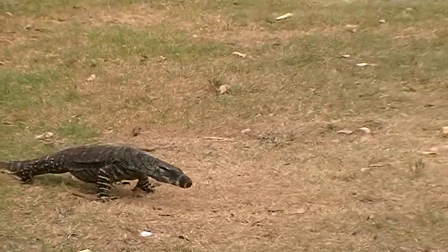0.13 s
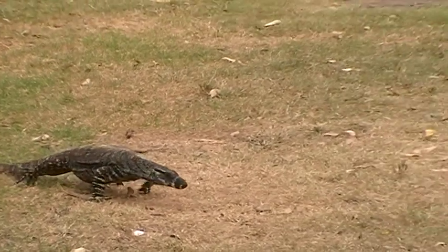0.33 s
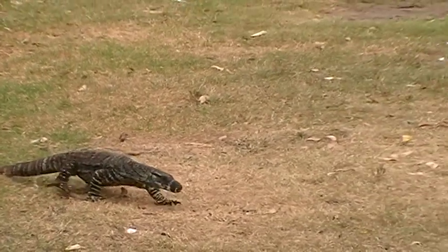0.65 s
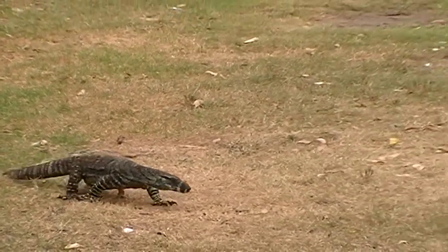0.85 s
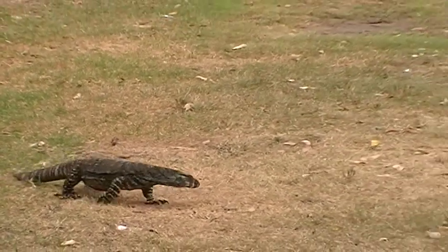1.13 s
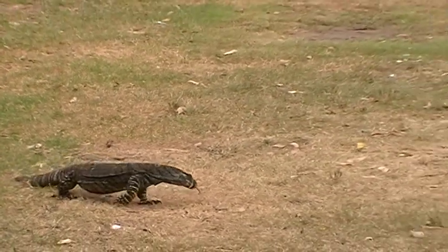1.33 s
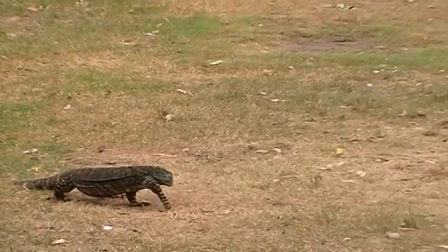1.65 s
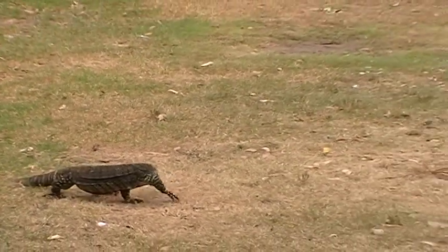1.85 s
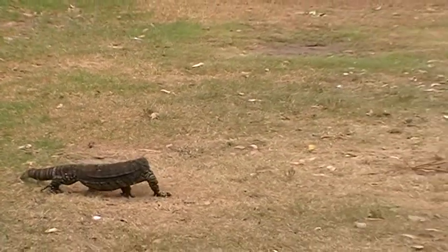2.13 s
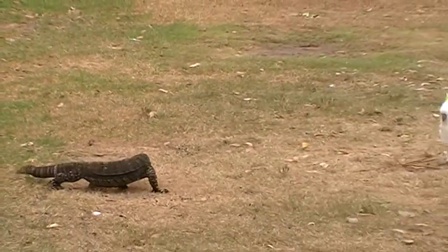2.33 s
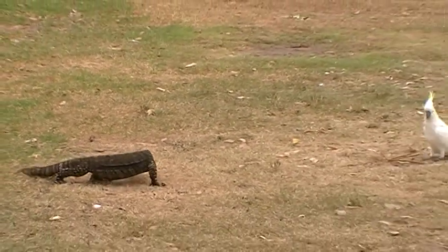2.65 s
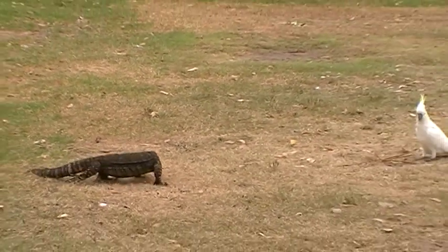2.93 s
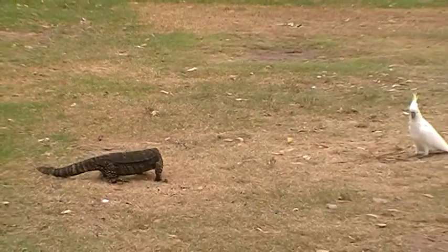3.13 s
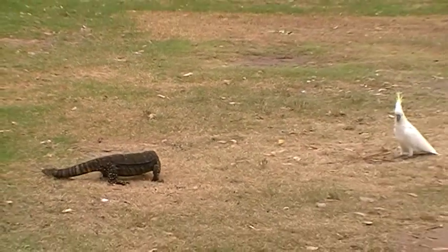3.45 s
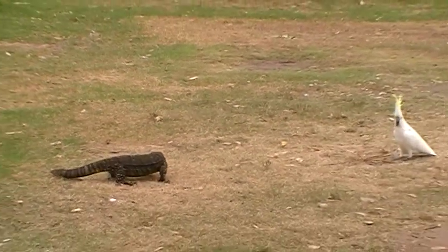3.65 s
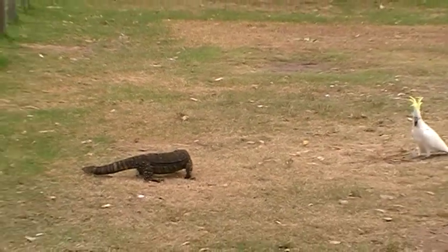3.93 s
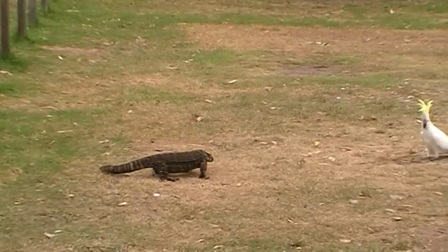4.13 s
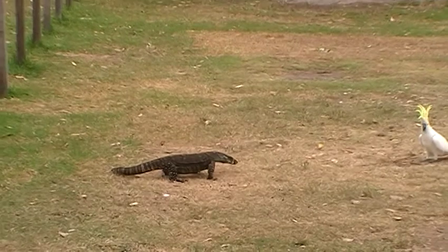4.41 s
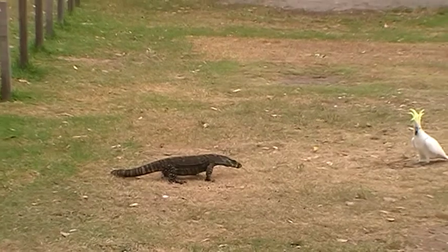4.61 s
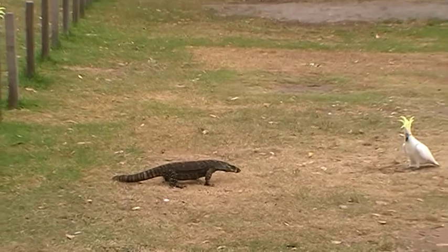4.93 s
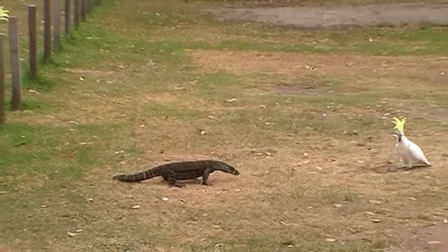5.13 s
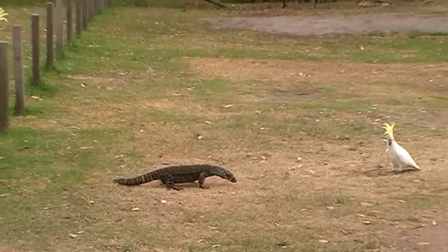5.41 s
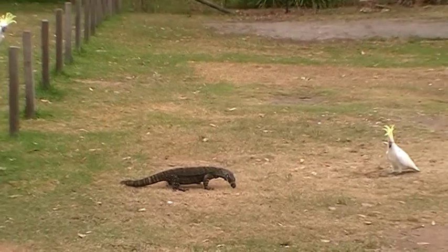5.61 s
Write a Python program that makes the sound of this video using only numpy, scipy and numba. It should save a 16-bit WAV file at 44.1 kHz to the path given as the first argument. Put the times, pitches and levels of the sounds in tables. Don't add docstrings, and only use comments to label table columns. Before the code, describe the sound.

After three seconds of soft leaves, far caws and small chirps, a cockatoo screeches harshly close by, pauses briefly, then shrieks again, cut short.

```python
import sys
import numpy as np
from scipy import signal
from scipy.fft import rfft, irfft
from scipy.io import wavfile
from scipy.ndimage import uniform_filter1d, map_coordinates
from numba import njit

SR = 44100
rng = np.random.default_rng(int(sys.argv[2]) if len(sys.argv) > 2 else 0)


def store_pcm(level_fs):
    pcm = np.round(np.clip(level_fs, -1, 1) * 32767).astype(np.int16)
    wavfile.write(sys.argv[1], SR, np.atleast_2d(pcm).T)


def rack_gain(trim_db):
    fader = np.asarray(trim_db, float)
    return 10 ** (fader / 20)


N = 254456

# (start [s], length [s], level [dB])
SCREECHES = [
    (3.204, 1.975, -19.5),
    (5.666, .3, -19.5),
]
# (time [s], effort [dB], burst rate [Hz], unsteadiness [0-1], beak gape [0-1])
POSTURES = [
    [(3.22, -1, 329.9, 0.34, 0), (3.33, 1, 325, 0.74, 0.44), (3.6, -1.5, 370.9, 0.81, 0.86),
     (3.72, 1.5, 350.7, 0.83, 0.67), (3.96, -0.5, 349.2, 1.09, 0.84), (4.22, 0.5, 324.4, 1.13, 0.52),
     (4.47, -0.5, 305.4, 1.02, 0.22), (4.72, -0.5, 338.5, 1, 0.67), (5.18, -1, 340.1, 0.82, 0.8)],
    [(5.67, 4, 333, 0.68, 0.79), (5.77, -2.5, 323.9, 0.94, 0.87)],
]
# (time [s], level [dB], half width [s])
LEVEL_DIPS = [
    (4.262, -3, 0.047),
    (4.828, -2, 0.034),
]
# (time [s], half width [s], extra strong-weak alternation [dB])
STEADY_LOCKS = [
    (3.385, 0.034, 5),
    (4.88, .03, 1),
    (4.952, 0.027, 3.5),
    (5.09, .025, -5.5),
]
# (time [s], level [dB])
THROAT_FLARES = [
    (3.205, 23),
    (3.302, 17),
    (3.55, 14.5),
    (4.53, 18.5),
    (4.701, 12),
    (5.17, 6.5),
]
# (time [s], turn [0-1])
HEAD_TURN = [(3.22, 0.54), (3.3, 0.23), (3.6, 0.27), (3.93, 0.59), (4.22, 0.49), (4.28, 0.26), (4.47, 0),
             (4.65, 0.42), (4.9, 0.66)]
# (time [s], delay [ms])
HEAD_BOB = [(3.2, .7), (3.6, .85), (3.9, .74), (4.22, .98), (4.3, .885), (4.43, .76), (4.52, .75),
            (4.67, .92)]
# (frequency [Hz], level [dB per Hz])
SLAP_SPECTRUM = [(120, -32), (200, -51), (586, -17), (859, -23.5), (994, -10.5), (1430, -17), (1950, -4.5),
                 (2860, -2.5), (3370, -0.5), (4040, -4.5), (4590, -8), (7930, -15), (9860, -31.5),
                 (12500, -41), (15600, -59.5)]
# (centre [Hz], width [Hz], boost [dB])
WINDPIPE_MODES = [(1939, 68, 7.5), (2139, 118, 4.5), (2240, 70, 3), (2367, 20, 10), (2857, 99, 6),
                  (3336, 86, -12.5), (4019, 195, 7.5), (4730, 670, -0.5), (6970, 300, 1.5),
                  (10370, 190, 6.5)]
# (frequency [Hz], level [dB per Hz])
SCATTER_SPECTRUM = [(590, -61), (1000, -49), (1190, -49), (1490, -48), (1630, -41), (1680, -72),
                    (1930, -10), (2370, 3), (3440, -1.5), (5230, -3), (6410, -6), (7100, -8.5),
                    (8710, -6.5), (11600, -25), (15000, -51)]
# (start [s], pitch [Hz], level [dB], lower throat rise [Hz], upper throat rise [Hz])
FAR_CAWS = [
    (.1, 382.3, -61.5, 30, 400),
    (1.178, 362.3, -64, 370, 320),
    (2.22, 364.4, -63, 356.4, 60),
]
# (start [s], pitch [Hz], level [dB], lower throat rise [Hz], upper throat rise [Hz])
DEEP_GROANS = [
    (5.24, 324, -55, 60, -60),
]
# (start [s], length [s], first pitch [Hz], last pitch [Hz], level [dB])
WHISTLES = [(0, 0.062, 1160, 1215, -60), (0.16, 0.18, 943, 929, -59), (0.392, 0.057, 1610, 1870, -55),
            (.42, .04, 1910, 2260, -57), (0.548, 0.074, 1660, 1800, -61), (0.726, 0.047, 1640, 1590, -63),
            (0.835, 0.035, 1564, 1730, -60), (1.17, 0.067, 3100, 3150, -66), (1.78, 0.035, 2010, 2100, -52),
            (1.8, 0.021, 2660, 2470, -46), (1.814, 0.026, 3290, 3080, -52.5),
            (1.822, 0.021, 3130, 2560, -52), (1.833, 0.073, 2250, 2344, -48),
            (1.883, 0.039, 2114, 1897, -48.5), (1.914, 0.044, 1917, 1925, -51)]
# (start [s], length [s], first pitch [Hz], last pitch [Hz], level [dB])
NASAL_NOTES = [
    (1.704, .025, 990, 1030, -66),
    (1.72, 0.037, 1142, 1135, -60),
    (1.75, 0.022, 1090, 1000, -64),
]
# (time [s], level [dB], centre [Hz], width [Hz])
GRASS_TICKS = [
    (1.18, -45, 8440, 1490),
    (1.178, -54, 1590, 1200),
    (2.175, -57, 2200, 1600),
    (2.695, -67, 8500, 3000),
    (3.097, -60, 8200, 1500),
    (3.125, -68, 11000, 3000),
    (3.142, -63, 10400, 2980),
    (5.655, -45, 3030, 2486),
]
# (time [s], level [dB])
CRICKET_LEVEL = [(2.66, -77), (2.85, -64.5), (3.05, -64), (3.2, -63)]
# (frequency [Hz], level [dB per Hz])
AIR_SPECTRUM = [(15, -60), (25, -70), (64, -2.5), (183, -5.5), (246, -6), (297, -3), (322, -4.5), (614, -6),
                (666, -7), (1110, -7.5), (1750, -11), (1900, -10), (3440, -16.5), (7700, -16), (15500, -43)]
# (frequency [Hz], side minus mid [dB])
AIR_SPREAD = [(30, -16), (90, -18), (180, -6.5), (400, -1), (1500, 0), (4000, -3.5), (6500, -9.5),
              (9000, 0), (13000, 5)]
# (frequency [Hz], decay time T60 [s])
TREE_DECAY = [(1000, 1.54), (2000, 0.83), (3500, 0.5), (7000, 0.91), (12000, 0.12)]


def level(x, db):
    return x * rack_gain(db) / np.sqrt(np.mean(x ** 2))


def on_log(table, hz):
    f, v = np.transpose(table)
    return np.interp(np.log(np.maximum(hz, 1)), np.log(f), v)


def curves(table, outside=None):
    s, *columns = np.transpose(table)
    return [np.interp(np.arange(N) / SR, s, c, outside, outside) for c in columns]


def causal(gain_db):
    c = irfft(gain_db * np.log(10) / 20)
    c[1:len(c) // 2] *= 2
    c[len(c) // 2 + 1:] = 0
    return irfft(np.exp(rfft(c)))[:len(c) // 2]


def band(x, hz, width):
    return signal.lfilter(*signal.iirpeak(hz, hz / width, fs=SR), x)


@njit
def moving_band(x, hz, width):
    y, b, l = np.empty(len(x)), 0., 0.
    for i in range(len(x)):
        g, k = np.tan(np.pi * hz[i] / SR), width / hz[i]
        v = (b + g * (x[i] - l)) / (1 + g * (g + k))
        b, l, y[i] = 2 * v - b, l + 2 * g * v, k * v
    return y


def walk(rate):
    k = int(SR / rate)
    steps = np.repeat(rng.standard_normal(N // k + 1), k)
    return 1.477 * uniform_filter1d(uniform_filter1d(steps, k), k)[:N]


def cockatoo():
    push_db, burst_hz, unsteady, gape = curves([row for table in POSTURES for row in table])
    turned = np.clip(curves(HEAD_TURN)[0], 0, 1)
    effort_db, age = breath()
    effort_db = effort_db + push_db
    gape = gape - 0.2 * np.exp(-age / 0.06)
    throat_hz = 1072.5 - 110 * turned
    source = syrinx(burst_hz, unsteady, age, throat_hz)
    f = np.arange(2049) * SR / 4096
    tract_db = on_log(SLAP_SPECTRUM, f)
    for hz, width, db in WINDPIPE_MODES:
        tract_db = tract_db + db / (1 + (2 * (f - hz) / width) ** 2)
    voice = signal.fftconvolve(source, causal(tract_db))[:N]
    voice = ground_echo(head_shadow(voice, turned), turned)
    voice = beak(voice, gape, turned)
    voice = voice / np.sqrt(uniform_filter1d(uniform_filter1d(voice ** 2, 1500), 1500))
    return rack_gain(8.0 + effort_db) * voice + throat(source, throat_hz, turned, effort_db), turned


def breath():
    attack_s, attack_db, release_s, release_db = 0.075, -28.5, 0.028, -13.5
    t, db, age = np.arange(N) / SR, np.full(N, -120.), np.zeros(N)
    for start, length, hold_db in SCREECHES:
        a = t - start
        swell = attack_db * np.clip(1 - a / attack_s, 0, 1) ** 2
        fade = release_db * np.maximum(a - length, 0) / release_s
        db = np.where((a >= 0) & (a < length + release_s), hold_db + swell + fade, db)
        age = np.where(a >= 0, a, age)
    for s, dip_db, half_width in LEVEL_DIPS:
        db = db + dip_db * np.clip(1 - abs(t - s) / half_width, 0, 1)
    return db, age


def syrinx(burst_hz, unsteady, age, throat_hz):
    settle = np.exp(-age / 0.04)
    unsteady = unsteady * (1 - 0.54 * settle)
    weak_db = 2.5 + 11.5 * np.exp(-age / 0.17) * (1 - settle)
    for s, half_width, db in STEADY_LOCKS:
        lock = np.clip(2 - 2 * abs(np.arange(N) / SR - s) / half_width, 0, 1)
        unsteady = unsteady * (1 - 0.75 * lock)
        weak_db = weak_db + db * lock
    sag = (age / 0.06) ** 2
    burst_hz = burst_hz * (1 - 0.2 * sag * np.exp(1 - sag))
    click = slaps(burst_hz, weak_db, unsteady, throat_hz)
    puff = signal.lfilter([1], [1, -np.exp(-1 / (0.0027 * SR))], click) * rng.standard_normal(N)
    source = level(click, 0) + level(puff * unsteady, -3.5)
    return signal.sosfilt(signal.butter(3, (210, 14600), "band", fs=SR, output="sos"), source)


def slaps(hz, weak_db, unsteady, fast_hz):
    cycle = np.cumsum(hz) / SR
    chance = rng.standard_normal((int(cycle[-1]) - 2, 9)).T
    count = np.arange(1, chance.shape[1] + 1)
    loose = np.interp(count, cycle, unsteady)
    jitter = np.clip(.25 * loose * chance[0], -.9, .9)
    at = np.interp(count + jitter, cycle, np.arange(N))
    now = at.astype(int)
    weak = np.cumsum(chance[2] < 1.2) % 2
    size = rack_gain(0.53 * loose * chance[1] - weak * weak_db[now])
    out = np.zeros(N)
    for k, db in enumerate((4.5, -7.5, -14, -37.0)):
        lead = k * SR / fast_hz[now] * (1 + 0.073 * chance[2 + k])
        spot = np.clip(at - lead, 0, N - 1).astype(int)
        np.add.at(out, spot, size * rack_gain(db + 0.87 * min(k, 1) * chance[5 + k]))
    return out


def head_shadow(voice, turned):
    for hz, width in ((6040, 920), (4744, 870), (10120, 750)):
        voice = voice - turned * band(voice, hz, width)
    facing = 1 - turned
    voice = voice - facing * band(voice, 443, 580)
    beam = 0.22 * band(band(voice, 2330, 870), 2330, 870) + 0.67 * band(voice, 5170, 650)
    dips = 0.67 * band(voice, 3866, 1160) + 0.56 * band(voice, 1540, 430)
    return voice + facing * (beam - dips)


def ground_echo(voice, turned):
    delay_ms = curves(HEAD_BOB)[0]
    share = np.clip(0.78 - 2 * turned, 0, 1)
    soft = signal.filtfilt(*signal.butter(1, (3000, 8500), "band", fs=SR), voice)
    return voice + share * map_coordinates(soft, [np.arange(N) - delay_ms * SR / 1000], order=3)


def beak(voice, gape, turned):
    top = signal.sosfilt(signal.butter(2, 6500, "high", fs=SR, output="sos"), voice)
    voice = voice + (rack_gain(0.5 + 8.5 * gape) - 1) * top
    voice = voice + (rack_gain(-7.5 + 17 * gape) - 1) * band(voice, 3004, 660)
    second_hz = np.maximum(2450 - 1200 * turned, 2100)
    voice = voice + (rack_gain(5 - 6 * gape) - 1) * moving_band(voice, second_hz, 300.0)
    return voice + (rack_gain(-4 + 7 * gape) - 1) * band(voice, 4130, 690)


def throat(source, throat_hz, turned, effort_db):
    flare_db = sum(db * np.exp(-abs(np.arange(N) / SR - s) / 0.032) for s, db in THROAT_FLARES)
    ring = moving_band(moving_band(source, throat_hz, 130.), throat_hz, 300.)
    line = np.sin(2 * np.pi * np.cumsum(throat_hz + 14 * walk(50)) / SR) * rack_gain(2.5 * walk(30))
    blend = level(ring, 0) * (1 - .6 * turned) + (.5 + 1.5 * turned ** 2) * line
    return blend * rack_gain(-46.5 + flare_db + 5 + np.minimum(effort_db + 24, 0))


def near_scatter(bird, turned):
    f = np.arange(1025) * SR / 2048
    smear = rng.standard_normal(2000) * np.exp(-np.arange(2000) / 300.)
    colour = np.convolve(causal(on_log(SCATTER_SPECTRUM, f) - on_log(SLAP_SPECTRUM, f)), smear)
    side = level(signal.fftconvolve(bird, colour)[:N] * rack_gain(6.2 * turned), -36.0)
    return np.array([side, -side])


def raven(row, length, lower_hz, upper_hz, peak, sag):
    start, pitch_hz, db, lower_rise_hz, upper_rise_hz = row
    u = (np.arange(N) / SR - start) / length
    hz = pitch_hz * np.interp(u, [0, 0.143, 1 - 0.143, 1], [1 - .04, 1, 1 - sag, 1 - sag - .05])
    opening = np.clip((u - .3) / .5, 0, 1)
    lower = lower_hz + lower_rise_hz * opening
    upper = upper_hz + upper_rise_hz * opening
    phase = 2 * np.pi * np.cumsum(hz * (1 + 0.00605 * walk(60))) / SR
    tone = 0
    for k in range(2, 11):
        weight = 0.83 / (1 + ((k * hz - upper) / 400) ** 2) + 1 / (1 + ((k * hz - lower) / 200) ** 2) + 0.18
        tone = tone + np.sin(k * phase) * rack_gain(2.6 * walk(24.58)) * weight
    return tone * rack_gain(db + np.interp(u, [0, peak, 1], [-6.5, 0, -6.5], -60, -60))


def ravens():
    caws = sum(raven(c, .375, 1090, 1810, 0.68, 0.0124) for c in FAR_CAWS)
    return caws + sum(raven(c, .22, 650, 1100, .3, .07) for c in DEEP_GROANS)


def songbird():
    out = np.zeros(N)
    notes = [(*n, -25) for n in WHISTLES] + [(*n, 4) for n in NASAL_NOTES]
    for start, length, first_hz, last_hz, db, octave_db in notes:
        i, n = int(max(start, 0) * SR), int(length * SR)
        phase = 2 * np.pi * np.cumsum(np.linspace(first_hz, last_hz, n)) / SR
        octave_db = octave_db + 14.5 / (1 + ((first_hz + last_hz - 3870) / 300) ** 2)
        burr = 1 + (first_hz > 2500) * .9 * np.sin(2 * np.pi * 190 * np.arange(n) / SR)
        shape = burr * rack_gain(db + 1.5) * np.sin(np.linspace(0, np.pi, n))
        out[i:i + n] += shape * (np.sin(phase) + rack_gain(octave_db) * np.sin(2 * phase))
    return out


def grass():
    cricket = band(band(rng.standard_normal(N), 8700, 700), 8500, 700)
    out = level(cricket * rack_gain(4.0 * walk(54)), 0) * rack_gain(curves(CRICKET_LEVEL, -120)[0])
    for s, db, hz, width in GRASS_TICKS:
        i = int(s * SR)
        burst = rng.standard_normal(600) * np.exp(-np.arange(600) / (.003 * SR))
        out[i:i + 600] += level(band(band(burst, hz, width), hz, width), db - 6)
    return out * np.array([[1.25], [.6]])


def trees(x, wet_db):
    n = int(1.5 * SR)
    t, mid, side = np.arange(n) / SR, 0, 0
    for hz in 500 * 2. ** np.arange(0, 5, .5):
        decay = np.exp(-np.log(1000) * t / on_log(TREE_DECAY, hz))
        fade = decay * (1 - np.exp(-t / 0.09))
        mid, side = (v + fade * band(rng.standard_normal(n), hz, hz / 3) for v in (mid, side))
    tail = np.array([mid + 0.15 * side, mid - 0.18 * side])
    return signal.fftconvolve(x[None], level(tail, wet_db) / np.sqrt(n), axes=1)[:, :N]


def air():
    f, out, swell = np.arange(N // 2 + 1) * SR / N, 0, walk(1.74)
    mid, side = (rfft(rng.standard_normal(N)) * rack_gain(on_log(AIR_SPECTRUM, f)) for _ in range(2))
    side = side * rack_gain(on_log(AIR_SPREAD, f))
    for hz in 22 * 2. ** np.arange(10):
        part = np.clip(1 - abs(np.log2(np.maximum(f, 1) / hz)), 0, 1)
        flicker = rack_gain(0.077 * swell + 1.35 * walk(5.94))
        out = out + flicker * irfft(part * np.array([mid + side, mid - side]), N)
    hum = rack_gain(-68.5 + 0.93 * walk(5.3)) * np.sin(2 * np.pi * np.cumsum(248 + 4 * walk(4.1)) / SR)
    insects = level(band(rng.standard_normal(N), 5640, 350), -71)
    return level(out, -55.5) + hum + insects


def scene():
    bird, turned = cockatoo()
    caws, whistles = ravens(), songbird()
    send = bird + 1.9 * band(bird, 5240, 800) + 3 * (caws + whistles)
    far = caws * np.array([[.7], [1.25]]) + whistles * np.array([[.92], [1.08]])
    return bird + near_scatter(bird, turned) + trees(send, wet_db=-25.0) + far + grass() + air()


@njit
def follow(x, attack, release):
    y, e = np.empty(len(x)), 0.
    for i in range(len(x)):
        e += (x[i] - e) * (attack if x[i] > e else release)
        y[i] = e
    return y


def band_limit(x):
    return signal.sosfilt(signal.butter(12, 15700, fs=SR, output="sos"), x)


def record(dry):
    loudness = follow(abs(dry).max(0), 1 / (0.022 * SR), 1 / (.09 * SR))
    gain = rack_gain(-7 * loudness / (loudness + 0.066))
    return band_limit(dry * gain)


dry = scene()
out = record(dry)
store_pcm(out)
```